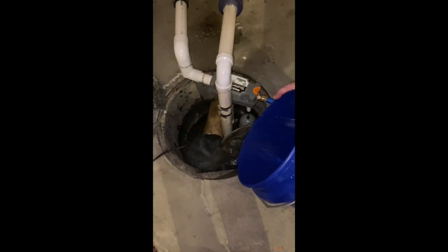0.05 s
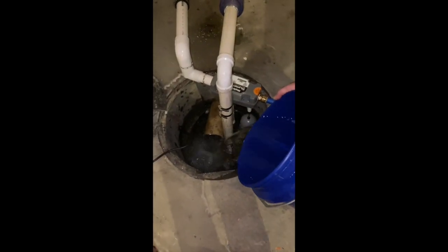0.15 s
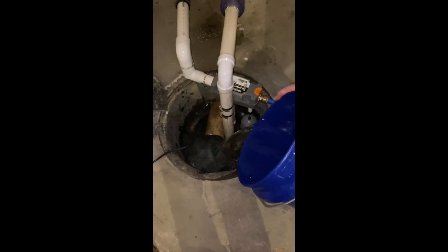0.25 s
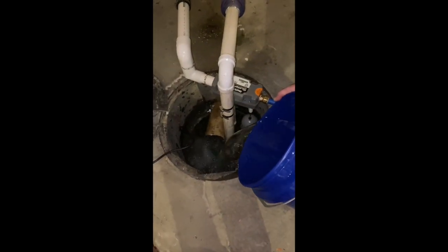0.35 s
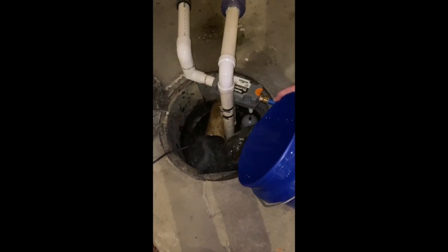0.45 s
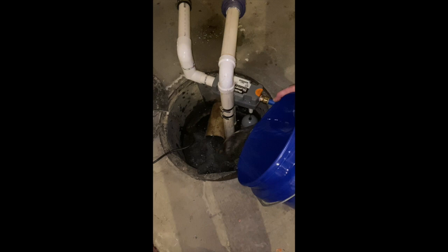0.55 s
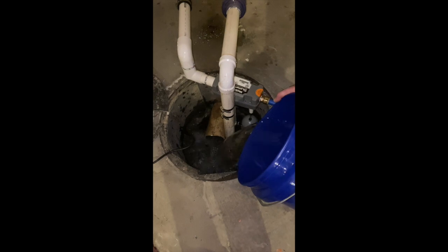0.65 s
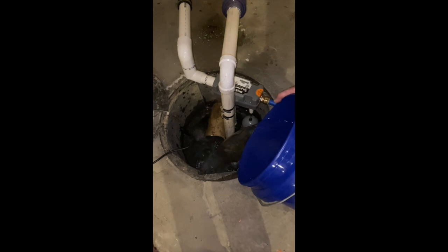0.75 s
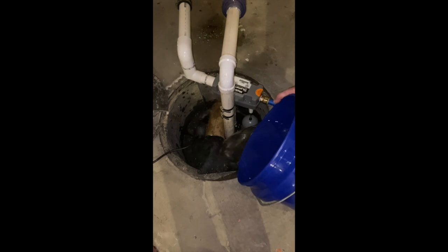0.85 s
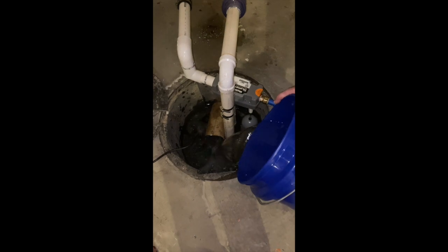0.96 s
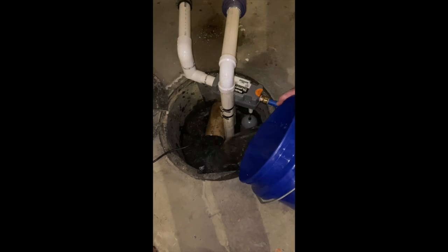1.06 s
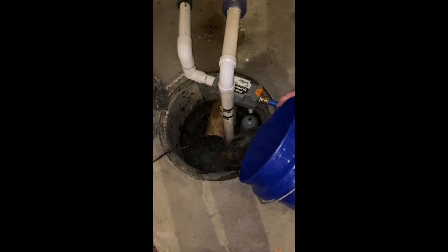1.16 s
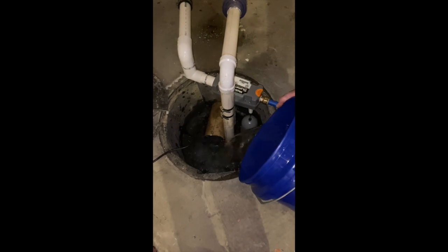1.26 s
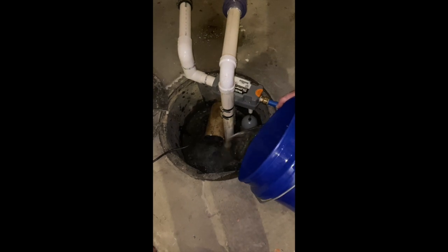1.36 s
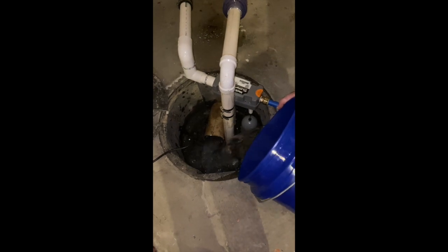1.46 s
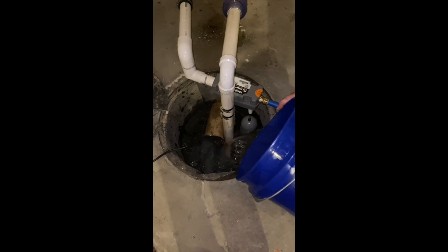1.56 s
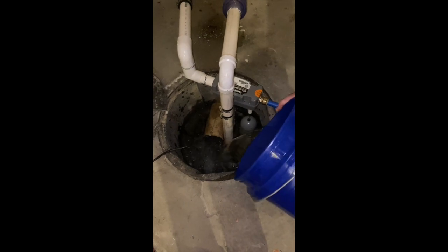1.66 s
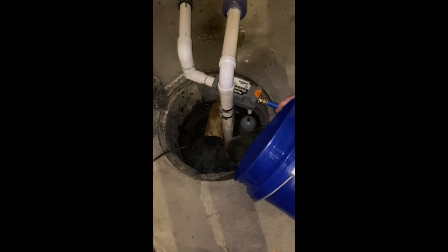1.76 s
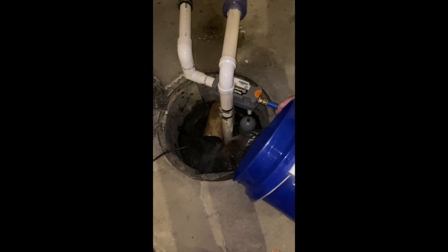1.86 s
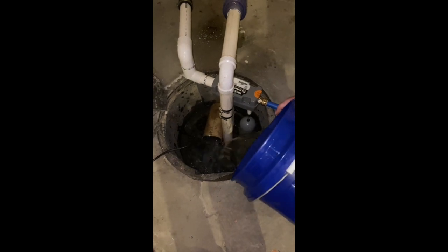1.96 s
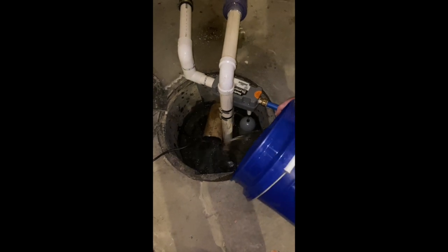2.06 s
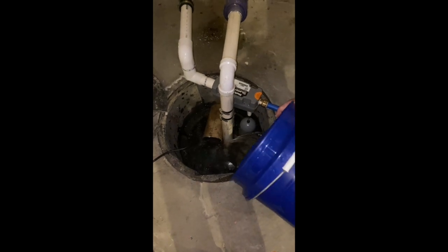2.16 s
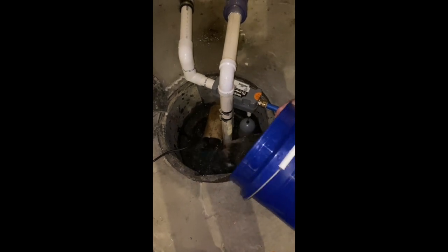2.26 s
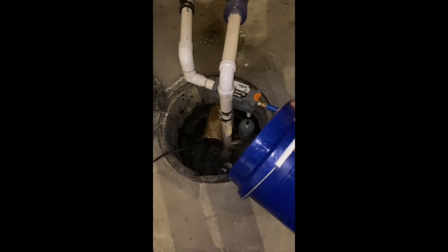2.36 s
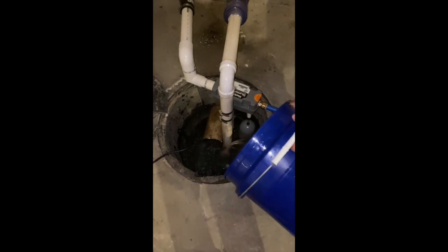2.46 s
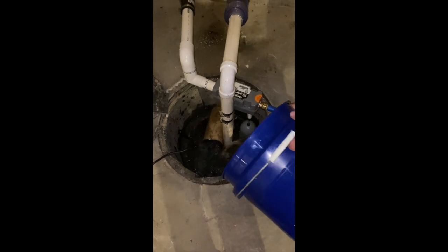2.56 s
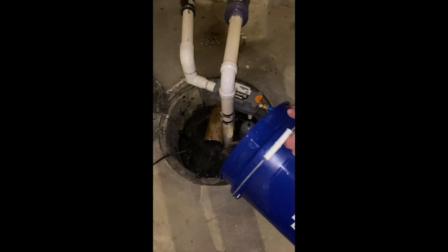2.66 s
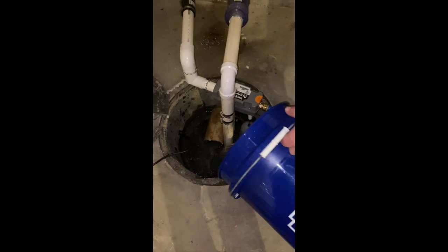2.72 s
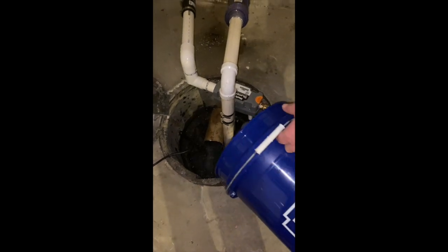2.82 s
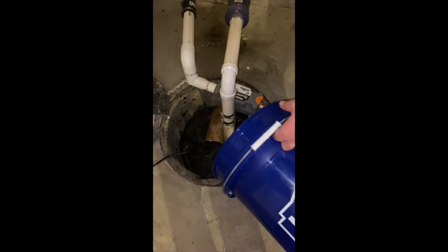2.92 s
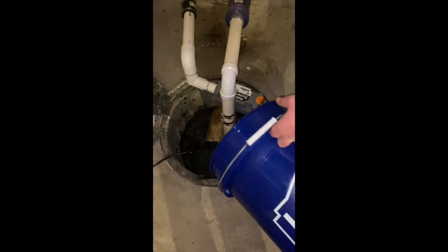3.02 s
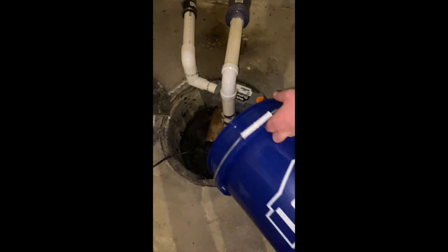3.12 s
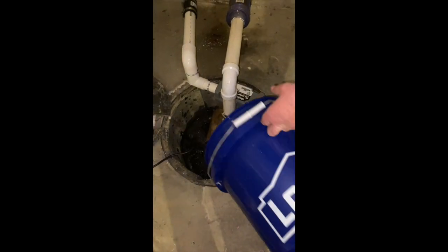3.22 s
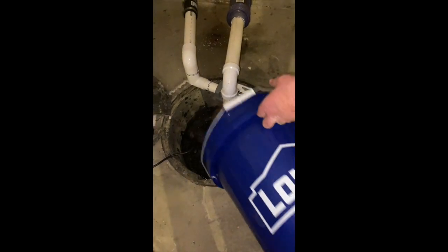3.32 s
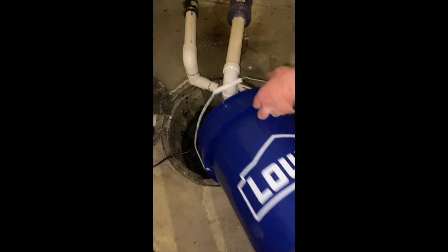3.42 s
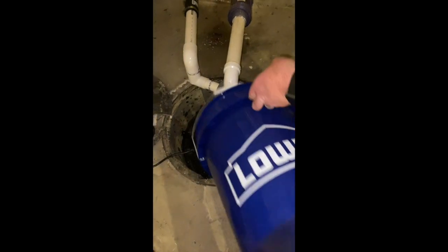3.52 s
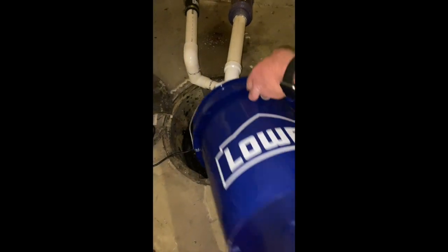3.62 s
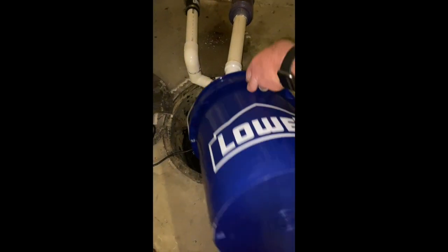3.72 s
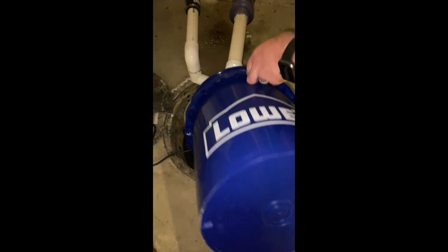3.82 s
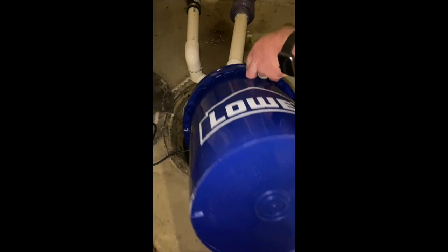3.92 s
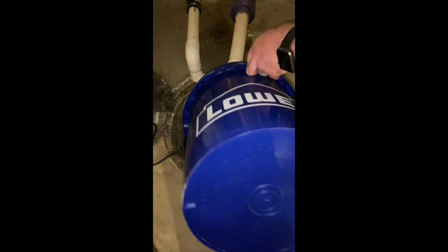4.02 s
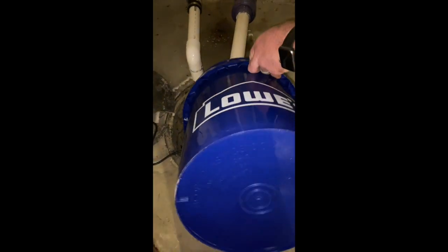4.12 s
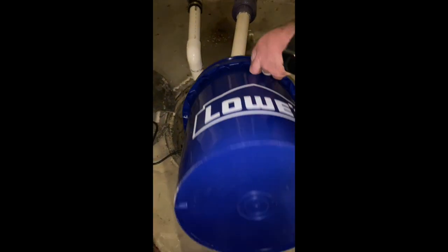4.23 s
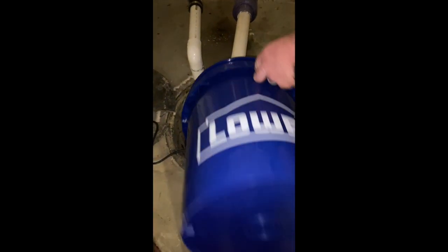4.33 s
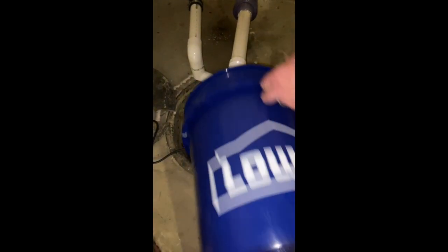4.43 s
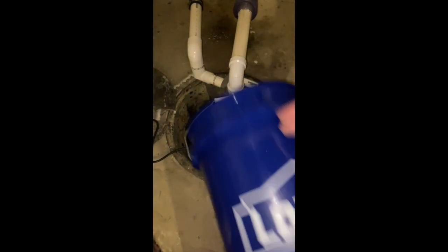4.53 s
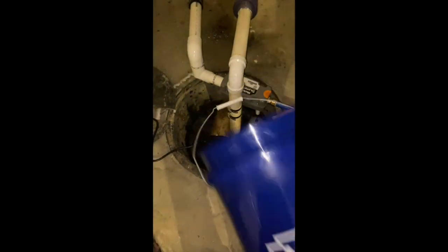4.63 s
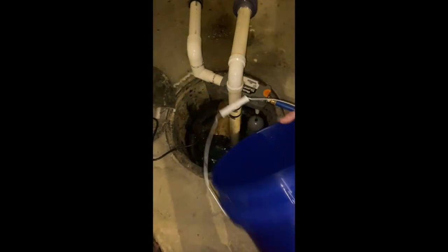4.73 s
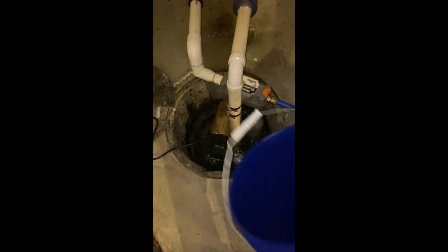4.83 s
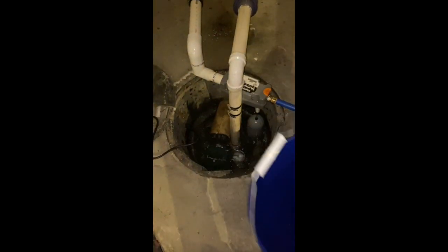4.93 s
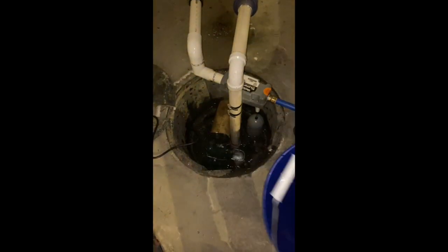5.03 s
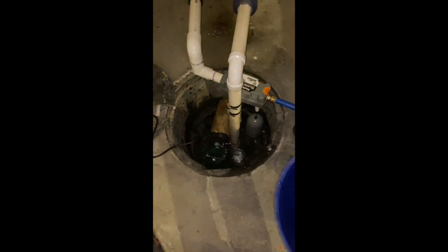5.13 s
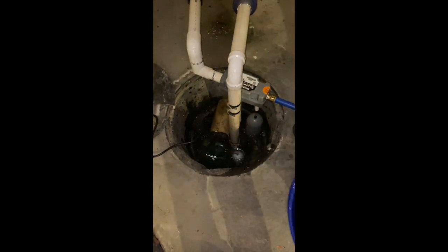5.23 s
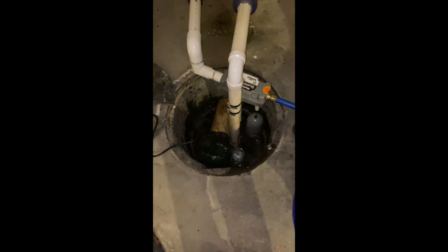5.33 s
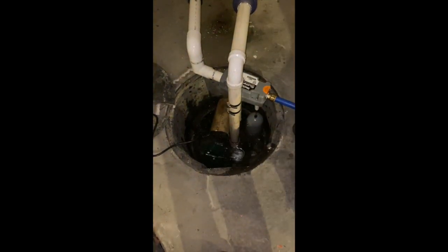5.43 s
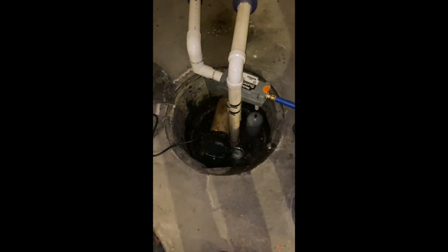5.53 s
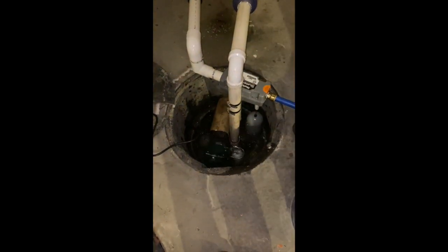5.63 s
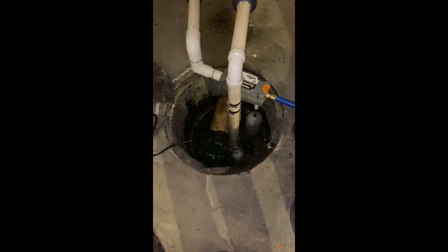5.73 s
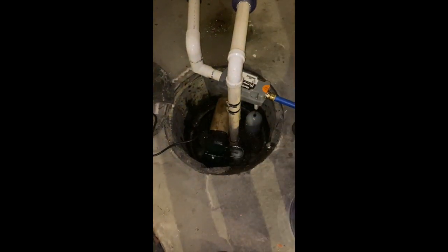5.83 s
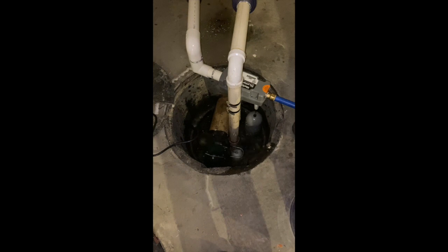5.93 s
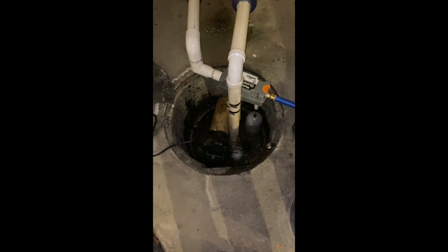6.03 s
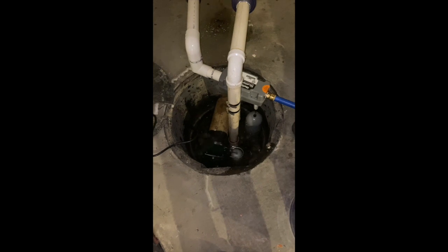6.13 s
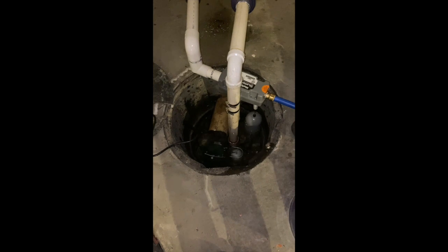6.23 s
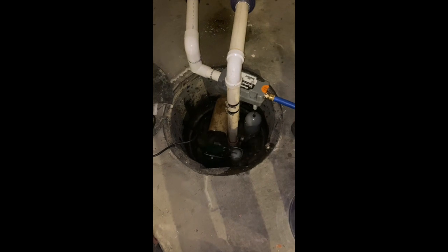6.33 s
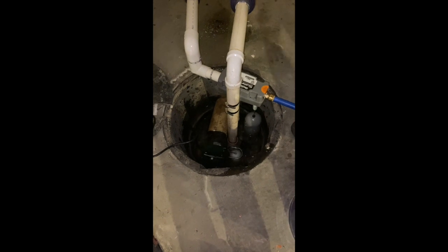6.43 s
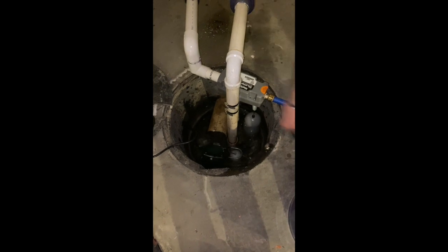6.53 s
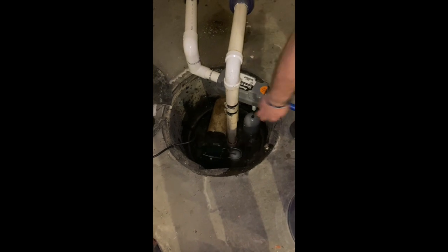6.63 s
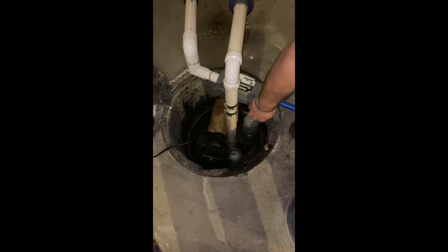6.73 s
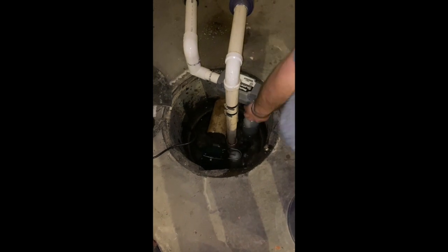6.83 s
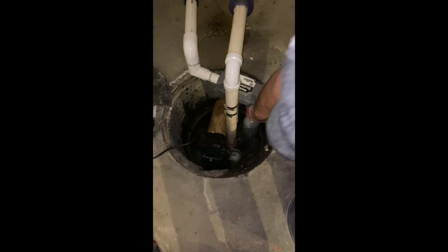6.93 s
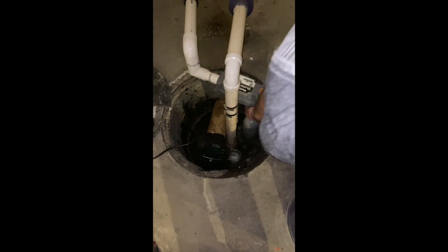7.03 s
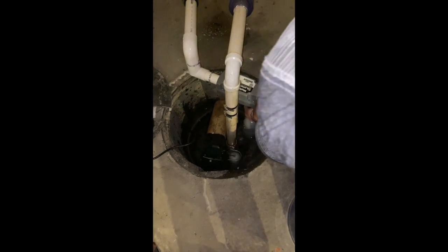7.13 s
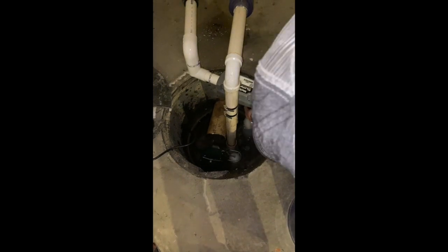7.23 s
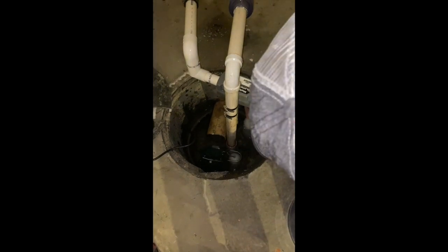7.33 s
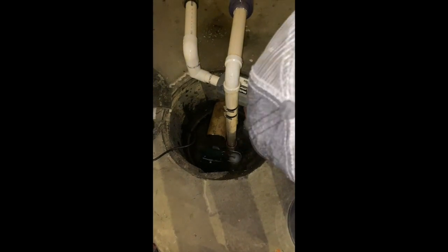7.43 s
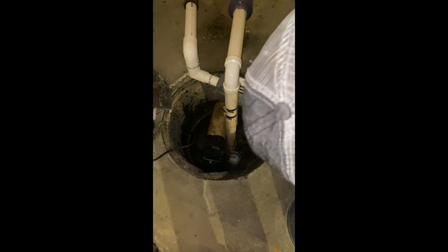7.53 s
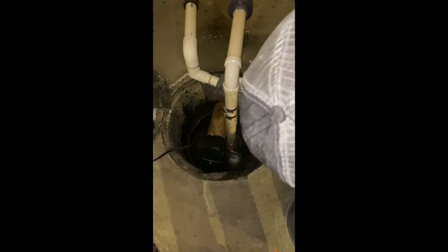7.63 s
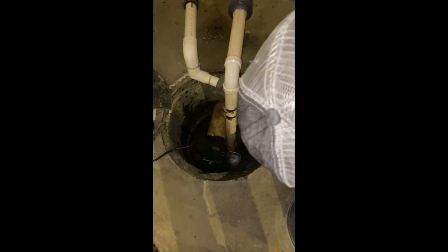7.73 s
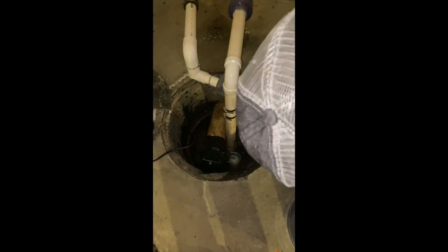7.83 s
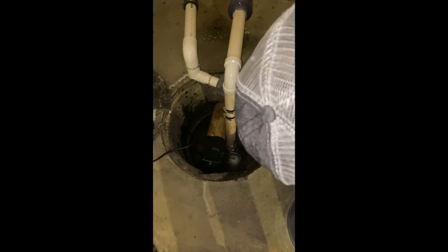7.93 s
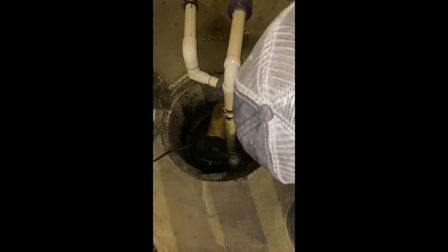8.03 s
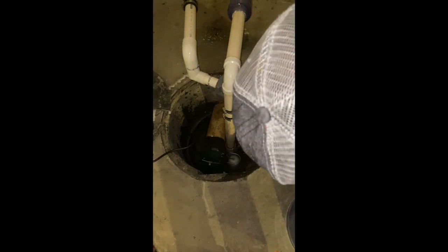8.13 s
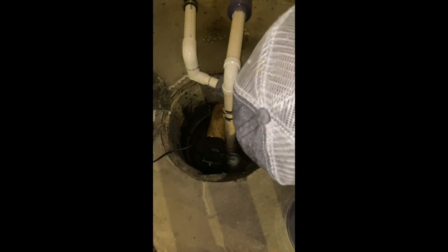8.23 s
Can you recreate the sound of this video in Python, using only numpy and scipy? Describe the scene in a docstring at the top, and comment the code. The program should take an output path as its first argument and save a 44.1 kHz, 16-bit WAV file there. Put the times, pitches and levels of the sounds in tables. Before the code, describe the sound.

Close stereo sound of a water-filled plastic bucket emptying into a pit: bright spray, bubbling plops and low gulps, thinning then surging at the end. A loud hard knock rings the bucket wall, the wire handle rattles, and the bucket bangs down hollowly, rocking on concrete. Afterwards quiet room hum, soft thuds and cloth rustle, a rough scuff, tiny squeaks and a few light knocks in a short basement echo.

```python
"""A plastic bucket is emptied into a sump pit in a concrete basement, over a low machine hum.
First the stream throbs, splashes, gulps and sprays: filtered noise for the impacts, ringing sines for bubbles.
As the last water runs out the bucket bumps the pipe: short noise bursts shake the resonances of its wall.
Its wire handle swings over and clacks, then the bucket is set down with a hollow boom, both as fading sines.
Last come soft steps, rustles, a scuff, faint squeaks and small knocks, made of low tones and shaped noise."""
import sys
import numpy as np
from scipy import signal
from scipy.fft import rfft, irfft, next_fast_len
from scipy.io import wavfile

SR = 44100
rng = np.random.default_rng(int(sys.argv[2]) if len(sys.argv) > 2 else 0)


def pcm_store(signal):
    """Save signal as 16-bit PCM."""
    levels = np.round(np.clip(np.atleast_2d(signal), -1, 1) * 32767)
    wavfile.write(sys.argv[1], SR, levels.astype(np.int16).T)


N = 364689
TIME = np.arange(N) / SR

# In the tables, t is the time of an event and f a pitch. Levels are relative: mixing and echo come later.
# how alike left and right are: f/Hz, correlation
LIKENESS = [(100,.99), (280,.96), (450,.75), (850,.35), (1400,.45), (2000,.78), (3000,.6), (7300,.85)]
# phase between the microphone ports: f/Hz, lead of the left side/rad
PORT_PHASE = [(100,0), (700,-1.1), (930,-1.8), (1150,-5), (1800,-5.75), (5200,-5.85), (7400,-3.14),
              (10300,0), (13700,3.14), (15800,6.28)]
# colour of the basement air: f/Hz, level per Hz/dB
AIR_COLOUR = [(15, -31), (25, -19.5), (50, -2.5), (153, -3.5), (185, -17), (223, -8.5), (408, -19.5),
              (820, -21.5), (1890, -28), (2080, -32.5), (2230, -32.5), (2880, -30), (3470, -36.5),
              (6500, -52.5), (8450, -61), (14300, -120)]
# steady tones of the machine hum: f/Hz, rms level/dB
HUM_TONES = [(156.1, -58), (274.5, -75.5), (484.5, -71), (812, -75.5), (2056, -81.5), (4400, -87)]
# clothes and soles rustle as the pourer moves: peak t/s, level/dB, half length/s
RUSTLES = [(4.593, -51, 0.14), (5.01, -54, 0.17), (5.914, -57.5, 0.18), (6.428, -51.5, 0.068),
           (6.935, -65, 0.092), (7.016, -62.5, 0.07)]
# colour of the rustles: f/Hz, level per Hz/dB
RUSTLE_COLOUR = [(200, -26.5), (700, 2.5), (1800, 2.5), (3000, -7.5), (5500, -13), (11000, -8.5),
                 (16000, -17)]
# low rumble as the pourer shifts and leans in: peak t/s, level/dB, half length/s
RUMBLES = [(4.542, -44.5, 0.083), (6.804, -32, 0.04), (6.88, -39, .04), (6.965, -46.5, 0.048),
           (7.052, -53, .05), (7.201, -50, 0.054)]
# colour of the rumble: f/Hz, level per Hz/dB
RUMBLE_COLOUR = [(20, -10), (40, 10), (100, 5), (170, 4), (280, -18), (600, -43), (3000, -90)]
# faint squeaks on one pitch: peak t/s, peak level/dB
SQUEAKS = [(7.5, -61), (7.571, -55), (7.98, -58.5)]
# small knocks and clicks around the pit: t/s, level/dB, chatter/s, low f/Hz, high f/Hz, high level/dB
TAPS = [(4.157, -54, .002, 4400, 5300, -5), (4.442, -45, 0.0032, 3850, 4600, -2),
        (4.902, -50, 0.0014, 4720, 11000, 7), (5.558, -56.5, .001, 4400, 10000, 9),
        (6.039, -32.5, 0.017, 299.6, 830, -9.5), (6.735, -46.5, 0.025, 442, 700, -21.5),
        (7.586, -36.5, 0.0077, 371, 534, 7.5), (7.585, -46.5, 0.0039, 1075, 2160, 7),
        (7.588, -36.5, 0.0012, 195, 860, -5), (8.015, -45.5, 0.013, 595, 1250, 0),
        (8.018, -56, 0.0021, 1910, 5000, -2)]
# something hard scuffs, then clacks roughly beside the pit: t/s, level/dB, chatter/s
SCUFFS = [(6.385, -59, 0.029), (6.411, -42, .02), (6.431, -31.5, 0.0054), (6.442, -41, 0.0051)]
# resonances of the scuffed thing: f/Hz, width/Hz, level/dB
SCUFFED_BODY = [(798, 12, -4), (1050, 30, -5.5), (1438, 90, 8), (1710, 140, 1.5), (2046, 90, -13),
                (2360, 110, -13), (3820, 130, -14), (5150, 150, -5)]
# dull thuds of the swung bucket and of feet: t/s, level/dB, settled f of first sway/Hz, swell/s, loss per sway/dB
THUDS = [(3.553, -22.5, 86, 0.0085, 28), (4.103, -48.5, 69.2, 0.04, 4), (4.347, -31, 87.5, 0.038, 7),
         (5.126, -33.5, 77, 0.023, 1), (6.750, -28, 96.8, 0.024, 8.5)]
# blows on the bucket's base: t/s, level/dB, contact/s, pitch factor of the flexed base, share of free ring time
BOOMS = [(5.300, -10.5, 0.0028, 0.94, 0.8), (5.661, -28, .001, 1.0, .35), (5.697, -12, 0.0018, 0.95, 0.45),
         (5.757, -17.5, 0.0034, 0.92, 0.5), (5.844, -30, 0.0009, 1.0, 0.35)]
# freely ringing base and the air in the bucket: f/Hz, level/dB, time to fall 60 dB/s
BASE_MODES = [(116.9, -1, 0.32), (119.7, -27, 0.84), (233, 3.5, 0.22), (238, -15, 0.66), (305, -22.5, 0.19),
              (487, -6.5, 0.17), (514, -19.5, 0.56), (645, -14.5, 0.08), (841, -27.5, 0.25)]
# the wire handle jingles in its sockets: t/s, level/dB
JINGLES = [(5.327, -24), (5.341, -35), (5.357, -34), (5.374, -36), (5.405, -34)]
# modes of the wire: f/Hz, level/dB, time to fall 60 dB/s
WIRE_MODES = [(1080, -10, .3), (1346, -16, .2), (1530, -12, .06), (1650, -4, .09), (1705, 0, .09),
              (1760, -8, .06), (1950, -13, .05), (2250, -7, .06), (2900, -17, .06)]
# the handle clacks against the wall: t/s, level/dB
CLACKS = [(4.389, -36), (4.642, -33), (4.651, -21), (4.665, -29)]
# modes of the clack: f/Hz, level/dB, time to fall 60 dB/s
CLACK_MODES = [(1523, -7, .1), (1857, -3, .07), (2143, 0, .06), (2245, -8, .07), (2358, 0, .05)]
# knocks of plastic and handle: t/s, level/dB, centre f of the ring/Hz, chatter/s, sharp crack level/dB,
# f of the struck spot/Hz, level of the struck spot/dB
KNOCKS = [(3.549,-9.5,1360,0.0026,-10.5,1936,-3), (3.559,-12,1303,0.0027,-12.5,951,-8.5),
          (3.567,-12,1100,0.0023,-16.5,1320,-1), (3.596,-24,1400,0.0082,-22.5,1350,0),
          (3.662,-21,1470,0.004,-13.5,1500,-2.5), (3.67,-26.5,1300,0.0074,-18.5,1100,-9),
          (3.694,-31,1300,0.0072,-13.5,1200,-10), (4.054,-33,790,0.0041,-7.5,837,-2),
          (4.099,-34,1290,0.0047,-27,1620,-6), (4.343,-37.5,1640,0.034,-34,1250,-16),
          (4.373,-34,810,0.01,-27,707,-5), (4.378,-34,1000,0.0014,-27,900,-9),
          (4.442,-32,1900,0.0077,-17,1750,2), (4.461,-27.5,1290,0.0013,-28,1095,-4),
          (4.472,-34,1400,0.0013,-19,1250,3), (4.494,-29,1600,0.0017,-31,1500,-6),
          (4.499,-27,700,0.0019,-39,415,2), (4.522,-38,1500,0.0066,-24,1620,2),
          (4.65,-17.5,1900,0.0033,-11.5,2250,-11), (4.734,-34,1390,0.01,-27,1030,-2),
          (4.771,-38.5,1840,0.0033,-29,1860,-8), (5.3,-36.5,550,0.0075,-13,990,-4),
          (5.326,-45.5,1900,0.058,-6,1700,-11), (5.404,-48,2000,0.0043,-5,2250,-2.5),
          (5.659,-9.5,1910,0.0032,-14.5,1010,-2), (5.668,-15,1740,0.0047,-24,2080,-12),
          (5.697,-19.5,523,0.014,-36,1046,-13), (5.72,-33,1900,0.011,-15,2050,-6),
          (5.784,-41.5,1900,0.02,-19,2300,-6.5), (5.81,-32.5,1494,0.0071,-2.5,1030,4.5),
          (5.928,-45.5,1910,0.011,-17,1640,-11)]
# resonances of the bucket wall: f/Hz, width/Hz, level/dB
WALL = [(205, 67.1, 4), (318, 42, 2.5), (515, 14, 8), (637.5, 140, -6.5), (776, 45, -0.5), (997, 16, 3),
        (1106, 39, -0.5), (1190, 100, -12), (1351, 45, -0.5), (1520, 68, -3), (1690, 40, -3.5),
        (1913, 19, -6.5), (2015, 56, -14.5), (2136, 36, -2), (2250, 92, -15.5), (2800, 70, -12.5),
        (5000, 1860, -28)]
# resonances of the air in the pit: f/Hz, width/Hz, level/dB
PIT = [(740, 40, -1), (950, 40, 0), (1205, 60, 4), (1850, 80, -2), (2060, 70, 0), (2885, 45, 5),
       (3800, 300, -1)]
# lumps of water slap the surface: t/s, level/dB, centre f/Hz, length/s
SLAPS = [(0.001, -33, 2900, 0.011), (0.040, -36, 4430, 0.0068), (.343,-39.5,814,0.013),
         (0.418, -47, 3700, 0.013), (0.471,-40,1000,0.011), (0.596,-34,1340,0.035),
         (0.623, -41.5, 3700, .005), (0.672, -43, 4700, 0.0055), (0.71, -57, 4000, .004),
         (0.851,-36,3470,0.0067), (0.95, -44, 4000, .008), (1.031, -40, 4070, 0.006),
         (1.06, -47, 4600, 0.0055), (1.152, -39, 4100, 0.0065), (1.247,-36.5,2800,0.011),
         (1.45,-41,2600,.012), (1.634,-35,1180,0.028), (1.647, -33.5, 3870, 0.0083), (1.843,-36,1010,0.017),
         (1.955,-38,2020,0.0037), (1.986, -44.5, 3950, .01), (2.106, -41, 4900, 0.0078),
         (2.142, -41.5, 2400, 0.02), (2.304, -44, 3980, 0.005), (2.549,-39,3270,0.0084),
         (3.032, -43, 11000, 0.0033), (3.088, -44, 3480, 0.0047), (3.178,-40.5,2010,.014),
         (3.464, -35, 1890, 0.022)]
# the loudest single bubbles: t/s, level/dB, starting f/Hz
PLOPS = [(0.119, -31, 1870), (0.115, -35, 1380), (0.154, -37.5, 206), (0.338, -35.5, 210),
         (0.416, -29.5, 3600), (0.472, -24.5, 1000), (0.483, -30, 1170), (0.539, -30.5, 1760),
         (0.602, -33, 1450), (0.676, -29.5, 4530), (0.690, -29, 960), (0.712, -35, 247), (0.926, -37, 430),
         (1.031, -37, 1910), (1.158, -36, 215), (1.174, -31, 1230), (1.252, -33, 685), (1.300, -31.5, 344),
         (1.350, -31.5, 253), (1.458, -35, 736), (1.856, -34.5, 2820), (1.956, -27, 1850),
         (2.058, -33, 1190), (2.190, -28.5, 1910), (2.234, -27.5, 2020), (2.244, -27.5, 1150),
         (2.274, -27.5, 2010), (2.284, -35, 2885), (2.447, -33, 1950), (2.466, -35, 2190),
         (2.472, -32.5, 303), (2.551, -33.5, 2210), (2.570, -40, 2880), (2.676, -30.5, 1097),
         (2.690, -35.5, 302), (2.707, -33, 3150), (2.750, -36, 280), (2.800, -36.5, 1250),
         (2.838, -38, 1950), (2.940, -31, 2070), (2.959, -33.5, 2840), (3.035, -30, 218),
         (3.091, -29, 3200), (3.322, -36.5, 910), (3.754, -32, 295), (3.797, -28.5, 300), (3.925, -32, 294)]
# the stream until the bucket is empty: t/s, splash level/dB, level of gulping air pockets/dB, spray level/dB
FLOW = [(0.0, -34.5, -41, -39), (0.2, -36, -44.5, -41.5), (0.51, -37, -46, -43),
        (0.89, -37.5, -44.5, -41.5), (1.38, -37.5, -40.5, -40.5), (1.82, -39, -49.5, -44.5),
        (2.2, -37, -47.5, -42), (2.53, -45, -52, -47), (2.96, -50, -45, -52.5), (3.28, -38, -50.5, -42.5),
        (3.5, -51, -46.5, -54.5), (3.75, -39.5, -43.5, -44.5), (3.931, -34.5, -40, -37),
        (4.13, -56, -56, -54), (4.3, -62, -69, -60)]
# slugs of water slap into the pit: peak t/s, swell/dB, half length/s
SURGES = [(0.018, 2.5, 0.063), (0.436, 4.5, 0.0079), (0.686, 2, 0.046), (1.15, 5, 0.013), (1.457, 5, 0.016),
          (1.657, 5, 0.023), (2.243, 5, 0.069), (2.87, 11.5, 0.2), (3.519, 18.5, 0.11), (3.852, 5.5, 0.047)]
# colour of the splashing: f/Hz, level per Hz/dB
SPLASH_COLOUR = [(90, -12.5), (150, -1.5), (230, 11.5), (330, 0), (450, -1), (700, -13.5), (900, -14),
                 (1200, -5.5), (1550, -14.5), (2000, -1), (2600, -4), (3600, -1)]
# colour of the fine spray: f/Hz, level per Hz/dB
SPRAY_COLOUR = [(3700,2), (5500,0), (10500,-5.5), (16000,-9)]

AIR_DB, HISS_DB = -53, -76
WHINE_HZ, WHINE_DB = 2850, -78
SQUEAK_HZ, SQUEAK_HALF_S = 2040, 0.011
SWAY_S, SWAY_PITCH = 0.16, 0.69  # the weight settles in sways, each lower than the last
BUCKLE_SHARE, BUCKLE_S, WOBBLE_SHARE = .2, .01, .025  # how far the base's pitch bends
GRAZE_S, GRAZE_DB = 0.0088, -15.5  # a contact grazes the wall just before it bites
FLEX_SHARE = 0.008  # the wall flexes, so its resonances shift a little from knock to knock
PIT_DB = -4
BURBLE_DB, FIZZ_DB, GURGLE_DB = -4.5, -14, 1.5  # bubbles, against splash, spray and gulping
SURGE_SPRAY_SHARE = 0.64  # share of a slug's swell that the spray follows
SETTLE_DB_PER_S, FOAM_DB_PER_S = 5, 6  # ripples and foam die away once the stream stops
PATCH_LIMIT = 1.3
CUTOFF_HZ = 15900


def from_db(db):
    """Turn decibels into gain."""
    return 10 ** (np.asarray(db) / 20)


def rms_one(x):
    """Scale to an rms (average strength) of 1."""
    return x / np.sqrt(np.mean(x ** 2) + 1e-20)


def at_hz(points, hz):
    """Read a curve between its points, with pitch on a log scale."""
    points = np.array(points)
    return np.interp(np.log(hz + 1e-6), np.log(points[:, 0]), points[:, 1])


def cut(x, hz, kind, order=2):
    """Keep only some pitches, with a Butterworth filter."""
    hz = np.clip(hz, 10, .45 * SR)
    return signal.sosfilt(signal.butter(order, hz, kind, fs=SR, output="sos"), x)


def drift(rate):
    """Slow random wandering around 0 with rms 1; a higher rate in Hz wanders faster."""
    step = 40  # samples between points
    r = np.exp(-2 * step * np.pi * rate / SR)
    noise = rng.standard_normal(N // step + 2002)
    slow = signal.lfilter([1], [1, -2 * r, r * r], noise)[2000:]
    return np.interp(np.arange(N) / step, np.arange(len(slow)), rms_one(slow))


def resonate(x, hz, width):
    """A resonance rings at one pitch, with gain 1 at its top; a narrow one rings longer."""
    r = np.exp(-np.pi * width / SR)
    feedback = [1, -2 * r * np.cos(2 * np.pi * hz / SR), r * r]
    return signal.lfilter(np.array([1, 0, -1]) * (1 - r * r) / 2, feedback, x)


def add(track, s, sound):
    """Mix a sound into a track at time s."""
    start = max(int(s * SR), 0)
    track[..., start:start + sound.shape[-1]] += sound[..., :N - start]


def hump(s, half_s):
    """A smooth swell of height 1 around time s."""
    return np.exp(-((TIME - s) / half_s) ** 2)


def widen(pair, hz):
    """Two unrelated signals become left and right, as alike as a diffuse field at this pitch."""
    alike = at_hz(LIKENESS, hz)
    middle = np.sqrt(1 + alike) * pair[0]
    side = np.sqrt(1 - alike) * pair[1]
    return middle + side * np.array([[1], [-1]])


def diffuse_noise(colour, size):
    """Stereo noise of a given colour, rms 1, shaped pitch by pitch."""
    padded = next_fast_len(size)
    hz = np.arange(padded // 2 + 1) * SR / padded
    spectrum = widen(rfft(rng.standard_normal((2, padded))), hz)
    return rms_one(irfft(spectrum * from_db(at_hz(colour, hz)), padded)[:, :size])


def chatter(chatter_s, bite_s=0.0033):
    """Two unrelated bursts of tiny contacts that grip and then die away."""
    t = TIME[:SR // 4]
    return rng.standard_normal((2, len(t))) * np.exp(-t / chatter_s) * (1 - np.exp(-t / bite_s))


def rattled(force, hz, width):
    """One resonance shaken by a chattering contact, in stereo."""
    return widen([rms_one(ring) for ring in resonate(force, hz, width)], hz)


def at_level(sound, db):
    """Set the level of a blow by its first 20 ms."""
    return from_db(db) * sound / np.std(sound[:, :SR // 50])


def struck(modes):
    """A struck body rings at several pitches, each fading at its own pace."""
    t = TIME[:SR]
    return sum(from_db(db - 60 * t / t60) * np.sin(2 * np.pi * hz * t) for hz, db, t60 in modes)


def basement(x, direct_db, early_db, tail_db, early_s=0.017, t60=0.33, treble_t60=0.42, low_hz=330):
    """Direct sound, a dense volley from the pit, floor and near wall, then the tail of the room."""
    t = TIME[:SR // 2]
    volley, late = (diffuse_noise([(100, 0.009), (16000, 0.0036)], len(t)) for _ in range(2))
    volley = volley * np.exp(-t / early_s) * (t > .001)
    dull = cut(late, 1800, "low", order=1)
    late = dull * from_db(-60 * t / t60) + (late - dull) * from_db(-60 * t / treble_t60)
    late = late * np.minimum(t / .02, 1)  # the tail builds up over 20 ms
    echo = (from_db(early_db) * rms_one(volley) + from_db(tail_db) * rms_one(late)) / np.sqrt(len(t))
    echo = cut(echo, low_hz, "high", order=1)
    return from_db(direct_db) * x + signal.fftconvolve(np.atleast_2d(x), echo, axes=1)[:, :N]


def background():
    """Room air and faint hiss are noise; the machine's hum and thin whine are tones of wandering phase."""
    air = from_db(AIR_DB) * diffuse_noise(AIR_COLOUR, N)
    hiss_colour = [(2000, -12.5), (4500, -13.5), (10000, -12.5), (15000, -21.5)]
    hiss = from_db(HISS_DB) * diffuse_noise(hiss_colour, N)
    # the root of 2 turns an rms level into the height of a sine
    hum = sum(from_db(db) * np.sqrt(2) * np.sin(2 * np.pi * hz * TIME + drift(10.0))
              for hz, db in HUM_TONES)
    whine = from_db(WHINE_DB) * np.sqrt(2) * np.sin(2 * np.pi * WHINE_HZ * TIME + drift(3))
    return air + hiss + hum + whine


def rumbles(lumpy_db=2.5):
    """Lumpy low rumble that comes and goes with each movement."""
    swells = sum(from_db(db) * hump(s, half_s) for s, db, half_s in RUMBLES)
    return swells * from_db(lumpy_db * drift(25)) * diffuse_noise(RUMBLE_COLOUR, N)


def rustles(uneven_db=3.5):
    """Cloth and soles rub in short uneven strokes."""
    strokes = sum(from_db(db) * hump(s, half_s) for s, db, half_s in RUSTLES)
    return strokes * from_db(uneven_db * drift(30)) * diffuse_noise(RUSTLE_COLOUR, N)


def squeaks():
    """Short, slightly unsteady chirps."""
    swells = sum(from_db(db) * hump(s, SQUEAK_HALF_S) for s, db in SQUEAKS)
    return swells * np.sin(2 * np.pi * SQUEAK_HZ * TIME + drift(30))


def taps(damping=0.15, top_ratio=1.13):
    """Light touches on things that ring briefly at two pitches."""
    out = np.zeros((2, N))
    for s, db, chatter_s, low_hz, high_hz, high_db in TAPS:
        low = rattled(chatter(chatter_s), low_hz, damping * low_hz)
        high = rattled(chatter(chatter_s), high_hz, damping * high_hz)
        touch = cut(low + from_db(high_db) * high, top_ratio * high_hz, "low")
        add(out, s, at_level(touch, db))
    return out


def scuffs(bite_s=0.0025):
    """A dragging contact shakes many resonances at once."""
    out = np.zeros((2, N))
    for s, db, chatter_s in SCUFFS:
        body = sum(from_db(mode_db) * rattled(chatter(chatter_s, bite_s), hz, width)
                   for hz, width, mode_db in SCUFFED_BODY)
        add(out, s, at_level(body, db))
    return out


def thuds(rumble_db=-5, rumble_top=1.44, onset_rise=1.0, sag_s=0.0083, count=4):
    """A soft push sags in pitch as it swells and dies, then sways; rumble surrounds each swing."""
    out, t = np.zeros(N), TIME[:SR // 2]
    turn_s = t + onset_rise * sag_s * (1 - np.exp(-t / sag_s))  # time runs fast at first: a higher pitch
    for s, db, first_hz, swell_s, loss_db in THUDS:
        swell = t / swell_s * np.exp(1 - t / swell_s)
        for k in range(count):
            hz = first_hz * SWAY_PITCH ** k
            tone = np.sin(2 * np.pi * hz * turn_s)
            rumble = rms_one(cut(rng.standard_normal(len(t)), [hz / 2, hz * rumble_top], "band"))
            swing = swell * (tone + from_db(rumble_db) * rumble)
            add(out, s + k * SWAY_S, from_db(db - k * loss_db) * swing)
    return out


def jingles():
    """The jolt shakes the wire handle, which rings briefly."""
    out = np.zeros(N)
    for s, db in JINGLES:
        add(out, s, from_db(db) * struck(WIRE_MODES))
    return out


def clacks():
    """The swinging handle hits the wall and bounces, with a short bright ring."""
    out = np.zeros(N)
    for s, db in CLACKS:
        add(out, s, from_db(db) * struck(CLACK_MODES))
    return out


def booms(build_s=0.006, rock_db=2, slap_db=-13, slap_s=0.0098, slap_low_hz=170, slap_high_hz=520):
    """The base slaps the floor like a drum: it buckles, so modes start sharp, and wobbles as it rocks."""
    out, t = np.zeros(N), TIME[:SR]
    for s, db, contact_s, pitch, freedom in BOOMS:
        for free_hz, mode_db, t60 in BASE_MODES:
            hz = free_hz * pitch
            stretch = 1 + BUCKLE_SHARE * np.exp(-t / BUCKLE_S) + WOBBLE_SHARE * drift(28)[:SR]
            ring = np.sin(2 * np.pi * hz * np.cumsum(stretch) / SR)
            ring = ring / (1 + (hz * contact_s) ** 2)  # a long contact weakens the high modes
            fade = from_db(db + mode_db - 60 * t / (t60 * freedom))
            add(out, s, fade * ring * (1 - np.exp(-t / build_s)))
        slap = cut(chatter(slap_s), [slap_low_hz, slap_high_hz], "band")
        add(out, s, at_level(slap, db + slap_db)[0])
    return out * from_db(rock_db * drift(52))


def knock(centre_hz, chatter_s, crack_db, spot_hz, spot_db, spot_width=85, focus_octaves=0.97,
          crack_low_hz=2400, crack_high_hz=5500):
    """A contact chatters briefly into the wall; where it lands decides which resonances lead."""
    body = 0
    for hz, width, mode_db in WALL:
        share = from_db(mode_db) / (1 + (np.log2(hz / centre_hz) / focus_octaves) ** 2)
        flexed_hz = hz * (1 + FLEX_SHARE * rng.standard_normal())
        body = body + share * rattled(chatter(chatter_s), flexed_hz, width)
    spot = rattled(chatter(chatter_s), spot_hz, spot_width)
    crack = cut(chatter(2 * chatter_s), crack_low_hz, "high")
    crack = widen(cut(crack, crack_high_hz, "low", order=1), crack_high_hz)
    return rms_one(body) + from_db(spot_db) * rms_one(spot) + from_db(crack_db) * rms_one(crack)


def knocks(level_db=1.0):
    """Each knock is a graze and then the blow itself."""
    out = np.zeros((2, N))
    for s, db, *contact in KNOCKS:
        for lead_s, part_db in ((GRAZE_S, GRAZE_DB), (0, 0)):
            add(out, s - lead_s, at_level(knock(*contact), db + level_db + part_db))
    return out


def pit(water):
    """The air in the pit rings along with the water."""
    return water + sum(from_db(PIT_DB + db) * resonate(water, hz, width) for hz, width, db in PIT)


def slaps(spread=1.31):
    """A lump of water hits the surface: a burst of impacts around one pitch."""
    out = np.zeros((2, N))
    for s, db, hz, length_s in SLAPS:
        burst = cut(chatter(length_s), [hz / spread, hz * spread], "band")
        add(out, s, at_level(widen(burst, hz), db))
    return out


def bubble(hz, cycles, rise):
    """A trapped bubble rings for some cycles and climbs in pitch as it nears the surface."""
    turn = np.arange(int(2 * cycles * SR / hz)) * hz / SR
    shape = (1 - np.exp(-turn)) * from_db(-30 * turn / cycles)
    return shape / shape.max() * np.sin(2 * np.pi * turn * (1 + rise * turn / cycles / 2))


def plops(life_s=0.027, least_cycles=1.0, rise=0.075, slap_db=-7, slap_s=0.0091, level_db=1):
    """Each large bubble opens with a small slap of water."""
    out, t = np.zeros(N), TIME[:SR // 16]
    for s, db, hz in PLOPS:
        noise = cut(rng.standard_normal(len(t)), [hz / 2, hz * 2], "band", order=1)
        slap = rms_one(noise) * np.exp(-t / slap_s)
        add(out, s, from_db(db) * bubble(hz, least_cycles + life_s * hz, rise))
        add(out, s, from_db(db + slap_db) * slap)
    return from_db(level_db) * out


def bubbling(level_db, per_s, low_hz, high_hz, cycles, size_db=3, rise=0.12):
    """Bubbles of random pitch, strength and life are born at random moments."""
    out = np.zeros(N)
    for when, pitch, size, life in rng.random((int(per_s * N / SR), 4)):
        strength = from_db(size_db * min(-np.log(1 - size), 3.5))
        hz = low_hz * (high_hz / low_hz) ** pitch
        add(out, when * N / SR, strength * bubble(hz, cycles * (.5 + life), rise))
    return rms_one(out) * from_db(level_db)


def stream():
    """Levels of splash, gulping and spray: the flow, its slugs, and the settling afterwards."""
    s, *columns = np.transpose(FLOW)
    splash_db, gulp_db, spray_db = (np.interp(TIME, s, column) for column in columns)
    surge_db = sum(db * hump(when, half_s) for when, db, half_s in SURGES)
    idle_s = np.maximum(TIME - s[-1], 0)
    return (splash_db + surge_db - SETTLE_DB_PER_S * idle_s, gulp_db - SETTLE_DB_PER_S * idle_s,
            spray_db + SURGE_SPRAY_SHARE * surge_db - FOAM_DB_PER_S * idle_s)


def splashing(splash_db, gulp_db, spray_db, patchy_db=5.0, drop_db=4.5, spatters_per_s=45,
              spatter_s=0.0053, spatter_power=1.1, gulp_trim_db=-2.0, splash_trim_db=-6):
    """Countless uneven impacts, bunched into spatters; each band of drop sizes comes and goes."""
    sizes = np.minimum(rng.exponential(1, (2, 1, N)), 5)
    impacts = rng.standard_normal((2, 2, N)) * from_db(drop_db * sizes)
    lumps = (rng.random(N) < spatters_per_s / SR) * np.minimum(rng.exponential(1, N), 2.5)
    fading_lumps = signal.lfilter([1], [1, -np.exp(-1 / (spatter_s * SR))], lumps)
    spatter = np.sqrt(1 + spatter_power * fading_lumps)
    edges = np.geomspace(80, 17000, 25)  # borders of the pitch bands, Hz
    gulp, splash, spray = np.zeros((3, 2, N))
    for k, (low, high) in enumerate(zip(edges, edges[1:])):
        hz = np.sqrt(low * high)
        if hz > 3700:
            # fine spray is made of so many droplets that it is much smoother
            band = widen(cut(impacts[k % 2] * np.sqrt(spatter), [low, high], "band"), hz)
            spray += band * from_db(at_hz(SPRAY_COLOUR, hz) + patchy_db * drift(23) / 2)
        else:
            band = widen(cut(impacts[k % 2] * spatter, [low, high], "band"), hz)
            patch = PATCH_LIMIT * np.tanh(drift(28) / PATCH_LIMIT)
            part = gulp if hz < 520 else splash
            part += band * from_db(at_hz(SPLASH_COLOUR, hz) + patchy_db * patch)
    return (rms_one(gulp) * from_db(gulp_db + gulp_trim_db)
            + rms_one(splash) * from_db(splash_db + splash_trim_db) + rms_one(spray) * from_db(spray_db))


def scene():
    """Water in the pit, the bucket beside it, the room around both."""
    lows = basement(booms() + thuds(), direct_db=0.0, early_db=-6.0, tail_db=-5.0)
    hard_sounds = knocks() + clacks() + taps() + scuffs() + jingles()
    hard_sounds = basement(hard_sounds, direct_db=-3.5, early_db=-8.5, tail_db=-16.0)
    splash_db, gulp_db, spray_db = stream()
    burble = bubbling(splash_db, per_s=320, low_hz=900, high_hz=2500, cycles=17.0)
    fizz = bubbling(spray_db, per_s=260, low_hz=2400, high_hz=5400, cycles=36.0)
    gurgle = bubbling(gulp_db, per_s=33, low_hz=193, high_hz=670, cycles=1.6, size_db=2.5)
    bubbles = from_db(BURBLE_DB) * burble + from_db(FIZZ_DB) * fizz + from_db(GURGLE_DB) * gurgle
    bubbles = basement(bubbles, direct_db=-3.5, early_db=-3.5, tail_db=-15)
    plops_and_slaps = basement(plops() + slaps(), direct_db=-1, early_db=-8, tail_db=-16)
    water = pit(splashing(splash_db, gulp_db, spray_db) + bubbles)
    return background() + rumbles() + rustles() + squeaks() + lows + hard_sounds + plops_and_slaps + water


def ports(x):
    """The microphone ports differ in phase: half the lead goes to the left, half is taken from the right."""
    size = next_fast_len(N + SR // 10)
    lead = np.interp(np.arange(size // 2 + 1) * SR / size, *np.transpose(PORT_PHASE))
    turned = rfft(x, size) * np.exp(1j * lead / 2 * np.array([[1], [-1]]))
    return irfft(turned, size)[:, :N]


def record(dry, lean=0.31, lean_hz=650, lean_width_hz=550, low_cut_hz=30):
    """The lower mids lean to the right, the deepest bass is lost, peaks are rounded and the top is cut."""
    leaning = dry + lean * resonate(dry, lean_hz, lean_width_hz) * np.array([[-1], [1]])
    heard = cut(leaning, low_cut_hz, "high")
    rounded = np.tanh(ports(heard))
    return signal.sosfilt(signal.ellip(10, .1, 80, CUTOFF_HZ, fs=SR, output="sos"), rounded)


dry = scene()
out = record(dry)
pcm_store(out)
```